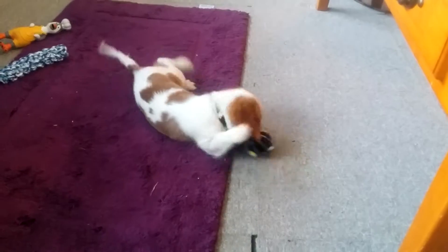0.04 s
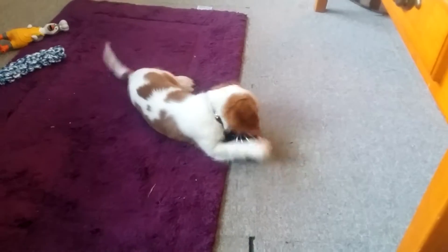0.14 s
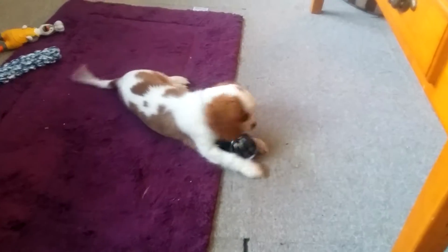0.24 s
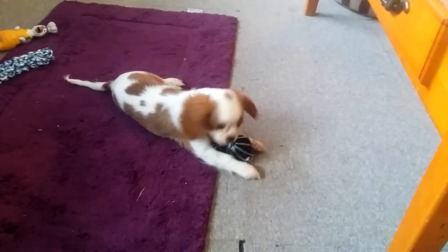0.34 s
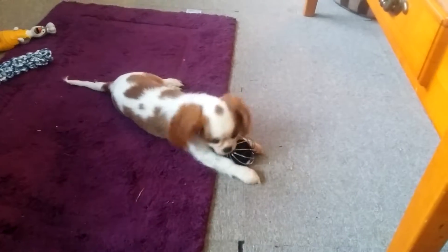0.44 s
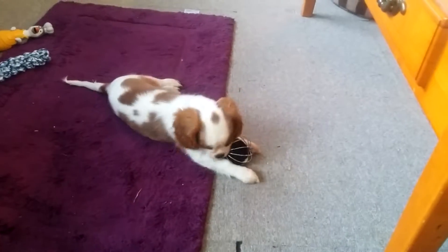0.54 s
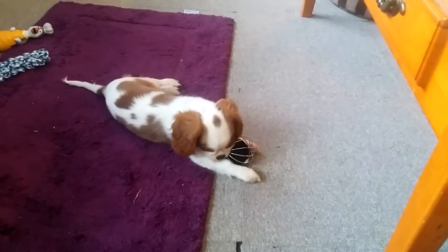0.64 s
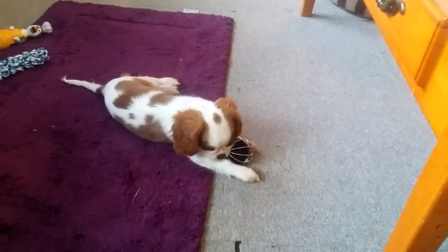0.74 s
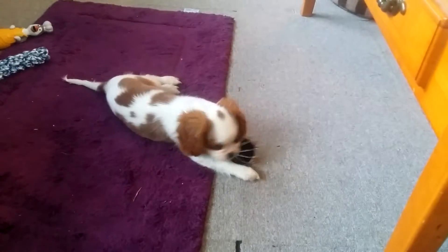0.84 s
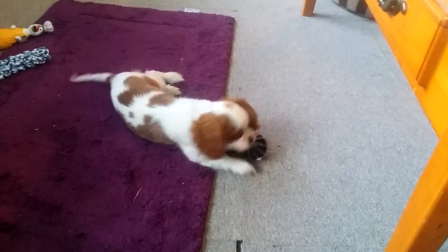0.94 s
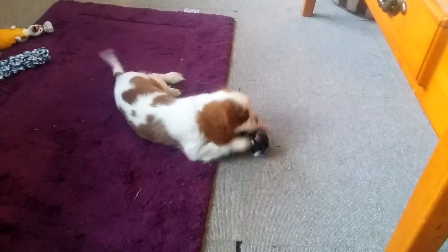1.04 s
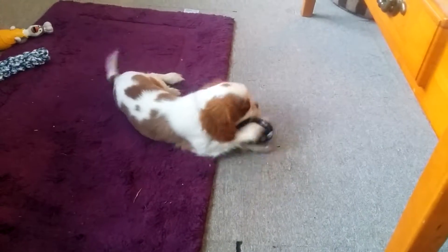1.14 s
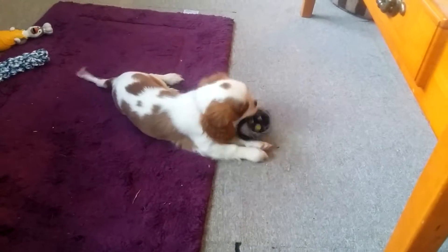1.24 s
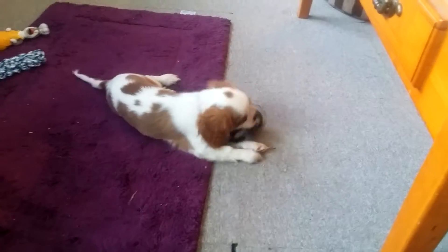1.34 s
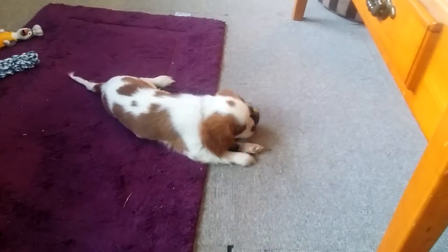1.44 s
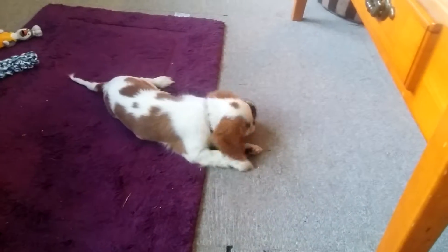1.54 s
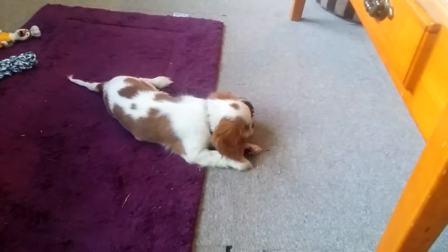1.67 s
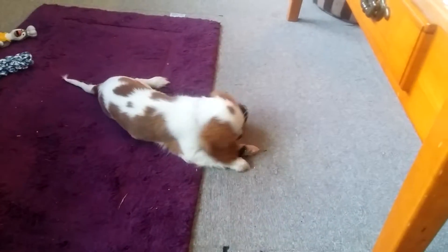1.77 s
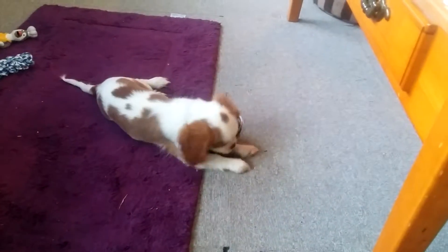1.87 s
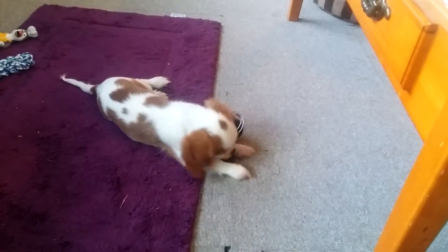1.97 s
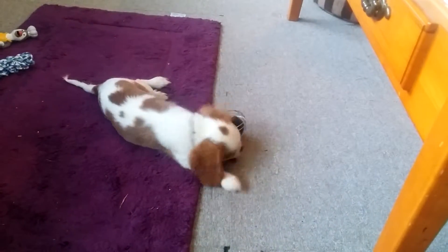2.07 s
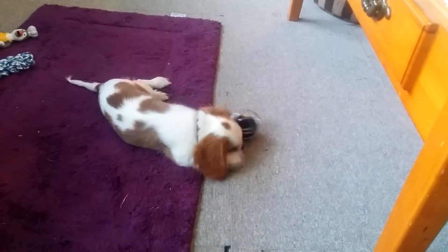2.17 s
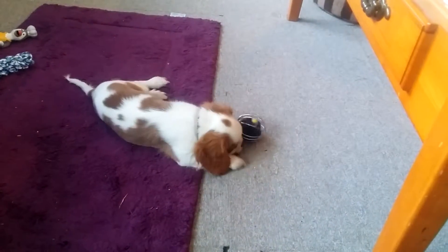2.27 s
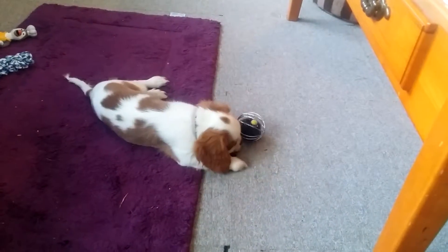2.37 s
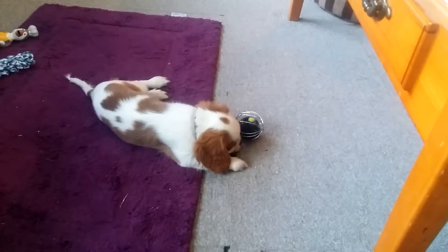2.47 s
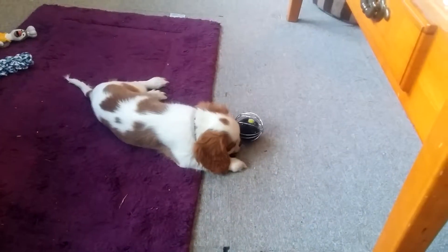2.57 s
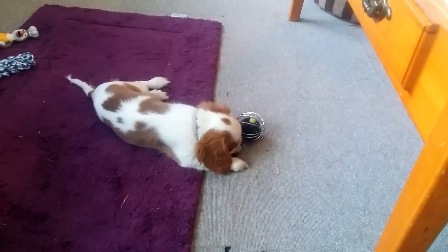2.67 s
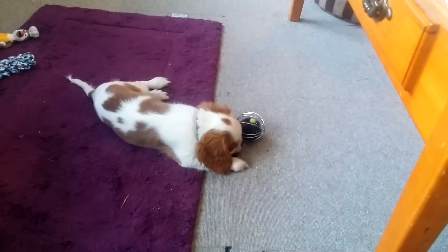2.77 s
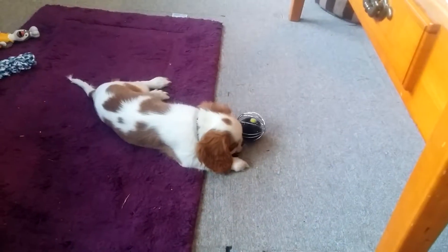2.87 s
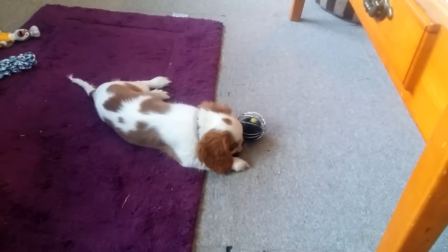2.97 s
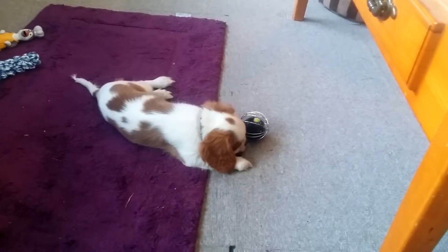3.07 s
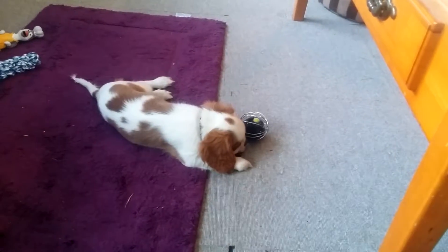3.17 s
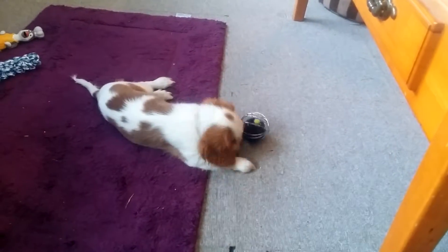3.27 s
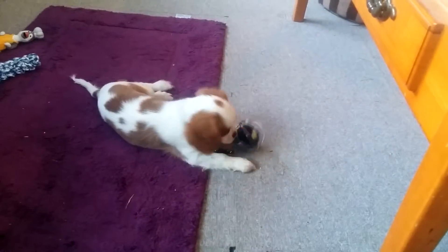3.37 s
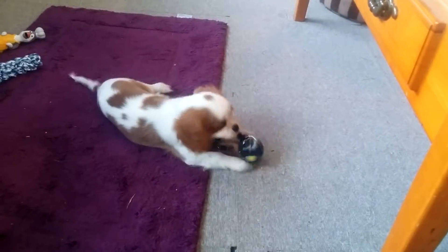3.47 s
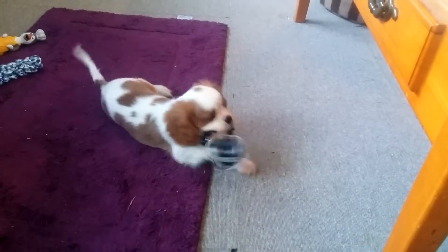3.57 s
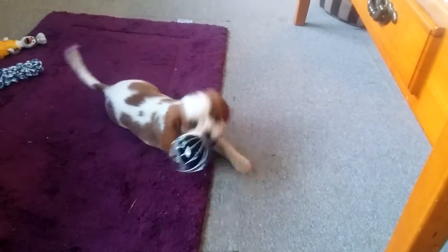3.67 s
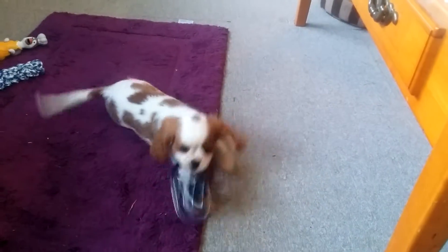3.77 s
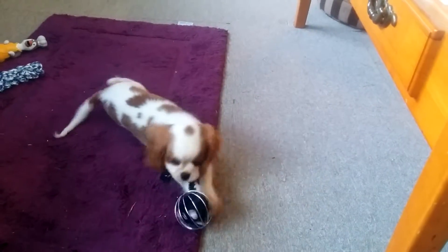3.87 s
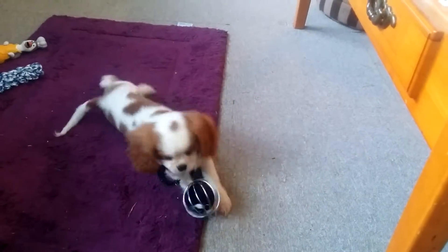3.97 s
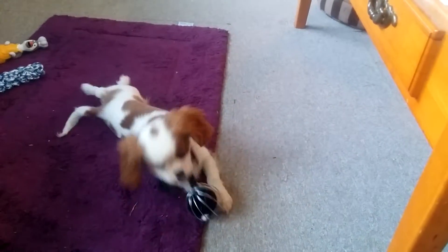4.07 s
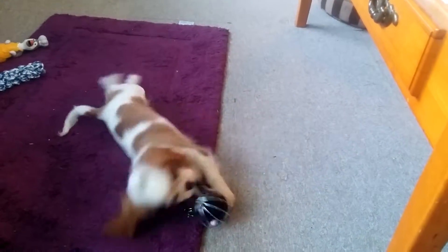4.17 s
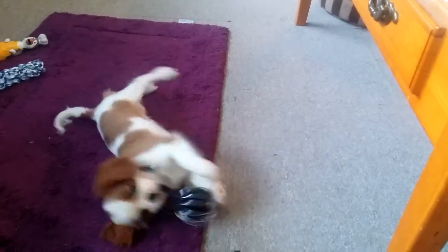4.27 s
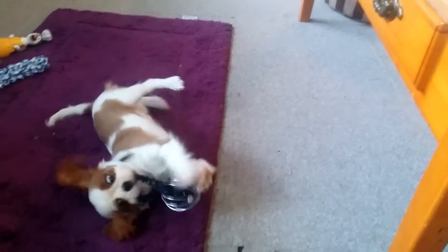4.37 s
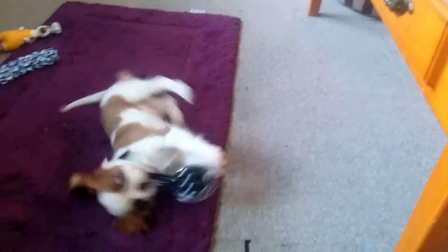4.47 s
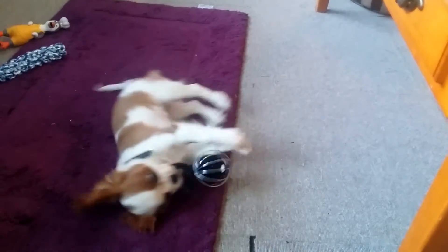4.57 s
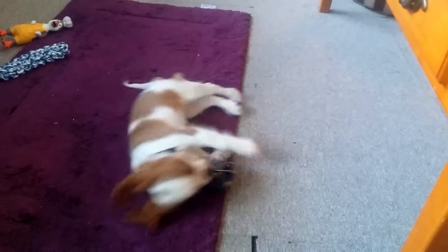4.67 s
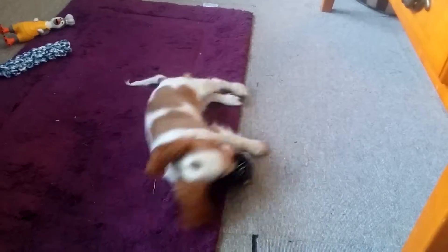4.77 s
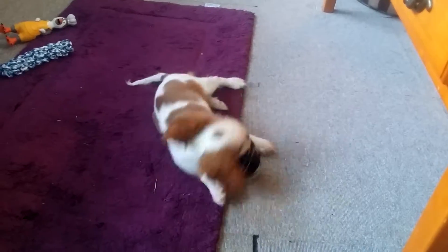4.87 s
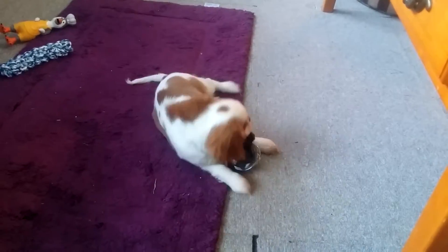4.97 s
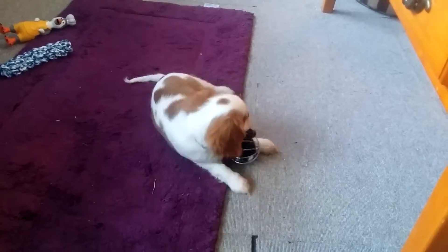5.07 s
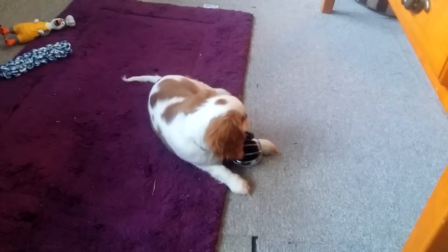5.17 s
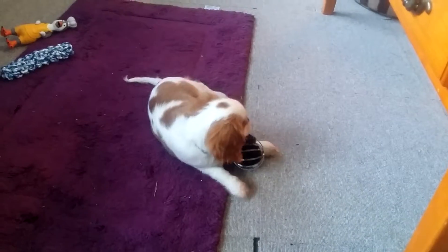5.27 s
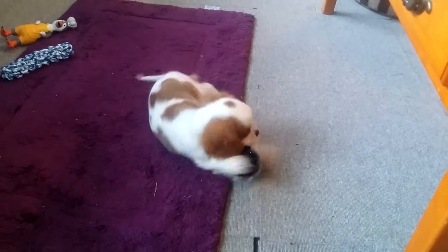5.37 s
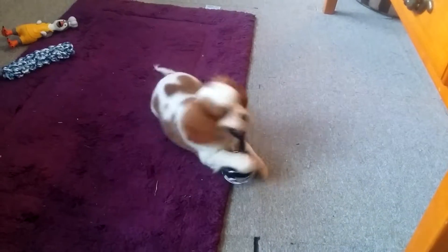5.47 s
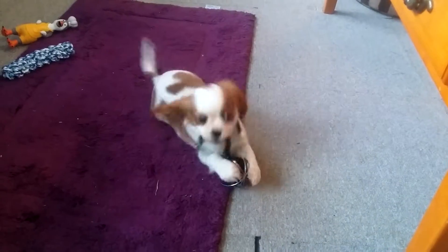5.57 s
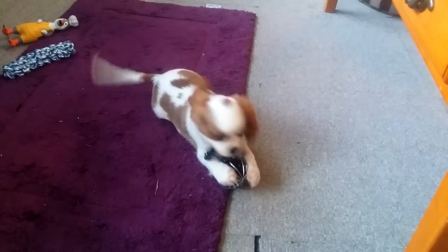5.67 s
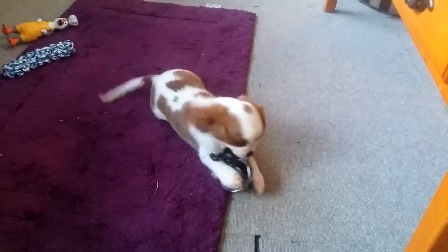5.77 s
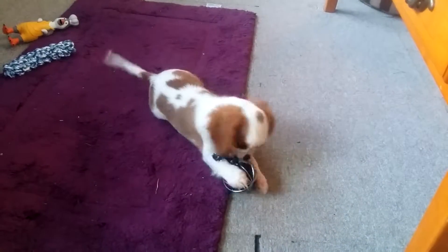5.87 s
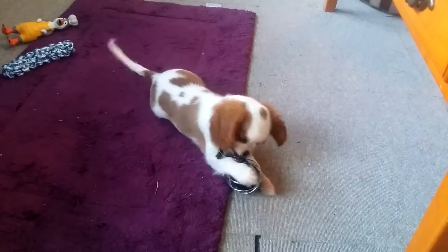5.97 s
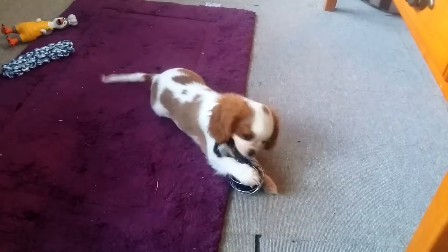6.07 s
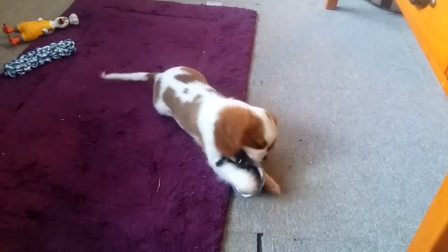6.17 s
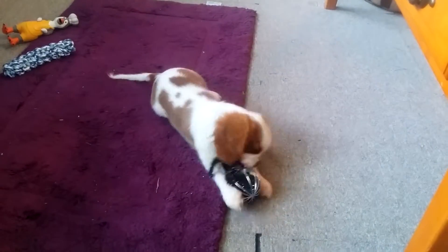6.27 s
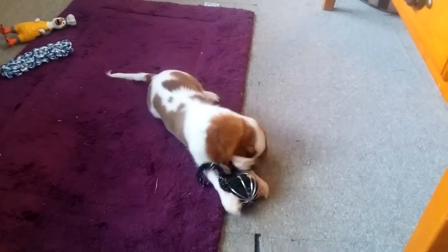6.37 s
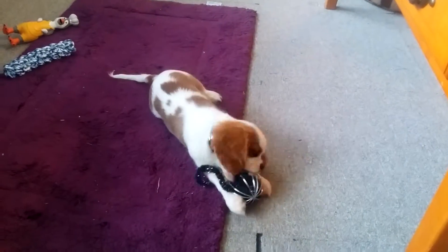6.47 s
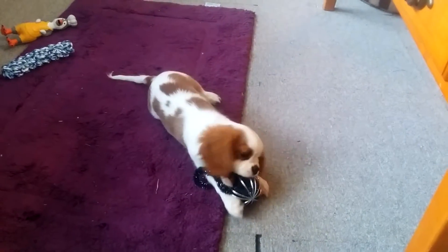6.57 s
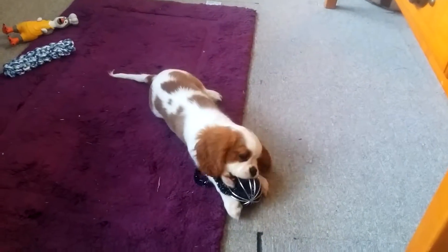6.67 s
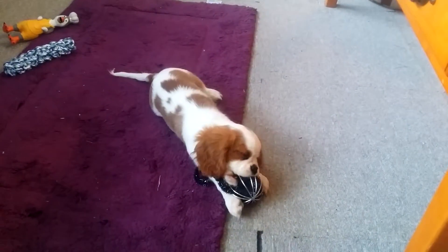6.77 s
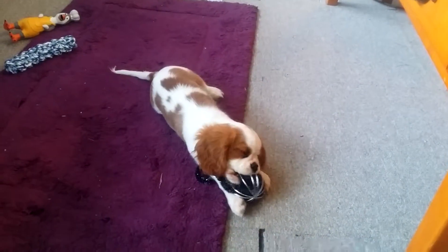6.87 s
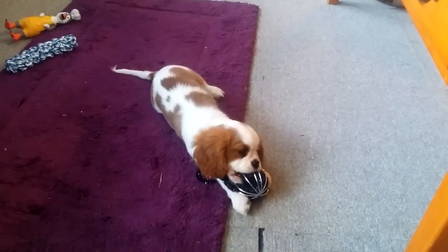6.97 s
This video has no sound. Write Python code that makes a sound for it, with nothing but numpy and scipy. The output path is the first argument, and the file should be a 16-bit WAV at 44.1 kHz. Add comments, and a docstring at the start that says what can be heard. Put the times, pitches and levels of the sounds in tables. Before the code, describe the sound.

A puppy plays with a hard slotted ball toy on carpet, heard from a couple of metres in a small furnished room with a short echo. Soft scuffs and a faint rattle open the first second. Around 1.2 to 1.6 seconds come dull thuds and a quick cluster of sharp, high clicks, followed by a few light ticks until 2.5 seconds and a lull. From 3.5 seconds the toy is shaken and dropped, its loose parts clattering against the faintly ringing cage. The loudest crack lands with a thud just before 4 seconds, and busy clicking and rattling continue until 5. Another burst of clicks with soft bumps comes at about 5.5 to 5.8 seconds. The rest is quiet, with one small knock near 6.6. The toy sounds brighter on the right. A few very faint squeaks occur along the way, over steady low rumble and hiss.

```python
"""Soft scuffs and a faint rattle, then sharp clicks: a puppy paws, shakes and drops a hard slotted ball toy.
Its loose parts click and rattle against the ringing cage; ball and paws thud on the carpeted floor.
Heard from a couple of metres on a phone's two microphones, in a small furnished room that adds
a short tail, over a few faint squeaks, low rumble and hiss."""
import sys
import numpy as np
from scipy import signal
from scipy.fft import rfft, irfft, next_fast_len
from scipy.io import wavfile
from scipy.ndimage import uniform_filter1d, map_coordinates

SR = 44100
rng = np.random.default_rng(int(sys.argv[2]) if len(sys.argv) > 2 else 0)


def generate_wav(sig):
    """Save sig (samples, or channels by samples) to the path in sys.argv[1] as 16-bit PCM at SR."""
    pcm = np.round(np.clip(np.atleast_2d(sig).T, -1, 1) * 32767).astype(np.int16)
    wavfile.write(sys.argv[1], SR, pcm)


N = 309395
T = np.arange(N) / SR


# Jolts that throw the loose parts against the cage, a couple of metres from the phone.
# Each row: start in seconds, level in dB, click pitch in Hz, bouncing time in seconds.
JOLTS = [(1.387, -9, 7000, 0.016), (1.4413, -18, 6100, .002), (1.4452, -15.5, 6000, 0.0045),
         (1.493, -18, 7150, .003), (1.5134, -20.5, 6740, 0.01), (1.557, -20, 7100, 0.0027),
         (2.004, -26, 6200, .003), (2.1864, -32, 5900, 0.02), (2.3101, -26, 5800, .002),
         (2.3572, -26, 6400, 0.0018), (2.5132, -28.5, 6950, 0.0022), (3.624, -12.5, 6800, 0.014),
         (3.7411, -15, 7500, 0.0023), (3.823, -14.5, 8000, 0.0022), (3.9017, -9.5, 6500, 0.007),
         (3.9322, 1.5, 6950, 0.0033), (3.936, 4.5, 7960, 0.013), (3.9923, -4.5, 7200, .002),
         (4.0392, -12, 7550, 0.017), (4.06, -5.5, 7100, 0.011), (4.137, -17, 7500, 0.0033),
         (4.164, -13, 7260, 0.0075), (4.2284, -17.5, 6600, .002), (4.2365, -16.5, 7360, .002),
         (4.2737, -17, 6200, 0.0066), (4.3301, -13, 6500, 0.0034), (4.36, -19.5, 6500, .002),
         (4.396, -12.5, 6500, .003), (4.4394, -13.5, 7100, 0.0024), (4.5268, -13, 7600, 0.0032),
         (4.537, -16, 7400, 0.0062), (4.5933, -10.5, 7200, 0.0022), (4.6108, -16, 7150, .002),
         (4.6186, -19, 6470, .002), (4.6786, -11, 7240, 0.0022), (4.7554, -7, 7500, 0.0089),
         (4.8088, -12, 6700, .012), (4.8889, -13.5, 7840, 0.0069), (4.9558, -13.5, 7000, 0.0018),
         (4.9789, -15, 6860, 0.004), (5.5518, -18, 6500, 0.0018), (5.555, -5, 8050, 0.0061),
         (5.5635, -9.5, 7400, .002), (5.5803, -9, 7900, 0.0021), (5.5931, -10, 6600, 0.0028),
         (5.6048, -11.5, 6360, .004), (5.61, -10, 7000, .002), (5.6299, -9.5, 7500, 0.0027),
         (5.6844, -16.5, 6500, 0.0036), (5.7156, -19, 7500, 0.0027), (5.7654, -24, 8040, 0.0036)]

def bounces(count=10, gap_s=.0028, gap_spread=.4, loss_db=12.5, pitch_octaves=.15):
    """Each jolt is a first contact and a run of ever weaker rebounds, returned as (s, dB, Hz) rows."""
    contacts = []
    for (s, db, hz, bouncing_s), (gap, spot) in zip(JOLTS, rng.uniform(-1, 1, (len(JOLTS), 2, count))):
        delays = np.cumsum(gap_s * (1 + gap_spread * gap))
        levels = db - loss_db * delays / max(bouncing_s, gap_s / 2)
        pitches = hz * 2 ** (pitch_octaves * spot)  # every rebound lands on another spot
        contacts += [(s, db, hz), *zip(s + delays, levels, pitches)]
    return contacts


# The spectrum of the parts' chatter and rattle. Each row: frequency in Hz, relative level in dB.
CLATTER_SPECTRUM = [(300, -28), (1000, -27.5), (2000, -20), (3000, -19), (4300, -3.5), (5500, -0.5),
                    (6700, 4.5), (8100, 2), (9300, -2), (11500, -12), (16000, -45)]

def clicks(rise_s=.0002, snap_db=-9, snap_hz=11500, snap_scatter_db=5, snap_s=.00006, chatter_db=-10):
    """Each contact is a sharp snap and a ping of a few cycles, then brief chatter as the parts settle."""
    t = T[:SR // 20]
    ping_shape = (t / rise_s * np.exp(1 - t / rise_s)) ** 2
    snap = np.exp(-((t - rise_s / 2) / snap_s) ** 2) * np.cos(2 * np.pi * snap_hz * t)
    settle = fade(t, t60=.011) * (1 - np.exp(-(t / rise_s / 2) ** 2))
    strikes, chatter_power = np.zeros(N), np.zeros(N)
    contacts = bounces()
    for (s, db, hz), (phase, hardness) in zip(contacts, rng.uniform(-.92, 1, (len(contacts), 2))):
        ping = ping_shape * np.sin(2 * np.pi * (hz * t + phase))
        strike = ping + snap * undb(snap_db + snap_scatter_db * hardness)
        add(strikes, s, undb(db) * strike)
        add(chatter_power, s, (undb(db) * settle) ** 2)
    chatter = np.sqrt(chatter_power) * unit(colour(rng.standard_normal(N), CLATTER_SPECTRUM))
    return strikes + undb(chatter_db) * chatter


# The toy nudged, rolled or shaken on the carpet. Each row: start in seconds, length in seconds,
# opening level in dB, loss by the end in dB (negative where the bout grows).
RATTLE_BOUTS = [(0, 0.13, -54, -4), (1.162, 0.18, -51, -2.5), (1.375, .05, -41, 7), (1.43, 0.13, -36, 12.5),
                (1.99, 0.039, -45, 0.5), (2.04, 0.32, -55, 0), (3.493, 0.19, -53.5, 6),
                (3.606, 0.075, -34, 7), (3.745, 0.14, -40.5, -1), (3.94, 0.08, -20, 18.5),
                (4.042, 0.064, -31.5, 7), (4.134, 0.027, -36, 0), (4.197, .07, -38, -1.5),
                (4.29, 0.24, -45, -4), (4.538, 0.16, -36.5, 6.5), (4.75, 0.12, -40, 2.5),
                (4.897, 0.086, -39, -0.5), (5.415, .11, -54.5, -3), (5.545, .17, -35, 10)]

def motion(attack_s=.0022, release_t60=.12):
    """How hard the toy moves: each bout starts quickly, sags or grows steadily, then comes to rest."""
    power = np.zeros(N)
    for start, length, db, sag_db in RATTLE_BOUTS:
        t = T[:int((length + release_t60) * SR)]
        attack = np.minimum(t / attack_s, 1)
        held = undb(db - sag_db * np.minimum(t / length, 1))
        release = fade(np.maximum(t - length, 0), release_t60)
        add(power, start, (attack * held * release) ** 2)
    return np.sqrt(power)


def rattle(per_second=190, scatter_db=4.5, tilt_db_per_octave=4):
    """Tiny contacts of uneven size while the toy moves, in three streams: dull, plain and bright."""
    out = np.zeros(N)
    for tilt in (-tilt_db_per_octave, 0, tilt_db_per_octave):
        sizes = undb(scatter_db * np.clip(rng.standard_normal(N), -2, 2)) * rng.choice([-1, 1], N)
        contacts = (rng.random(N) < per_second / SR) * sizes
        spectrum = [(hz, db + tilt * np.log2(hz)) for hz, db in CLATTER_SPECTRUM]
        out += unit(colour(contacts, spectrum))
    return motion() * unit(out)


# The modes of the toy's hard cage. Each row: frequency in Hz, relative level in dB, t60 in seconds.
CAGE_MODES = [(4666, -3, .25), (5184, -9, .22), (5631, -3, .22), (6223, -4, .25), (6380, -2, .25),
              (6525, -6, .22), (6669, -1, .2), (6803, -2, .22), (6988, 0, .22), (7133, -3, .2),
              (7487, -8, .2), (7700, -2, .22), (7933, -1, .22), (8237, 2, .24), (8350, 1, .2),
              (8850, -4, .2), (9254, -5, .19), (10119, 4, .2)]

def cage(contacts, ring_db=-61):
    """The bars of the cage ring on after every contact."""
    t = T[:SR // 2]
    ring = sum(undb(db) * fade(t, t60) * np.cos(2 * np.pi * hz * t) for hz, db, t60 in CAGE_MODES)
    return contacts + undb(ring_db) * convolve(contacts, ring)


# Ball and paws landing on the carpet.
# Each row: start in seconds, level in dB, floor pitch in Hz, t60 in seconds.
LANDINGS = [(1.193, -36.5, 52.3, 0.24), (1.335, -30, 48, 0.16), (1.384, -28, 58.4, 0.081),
            (3.668, -36.5, 54, 0.24), (3.921, -21.5, 63, 0.037), (3.94, -34, 78.4, 0.27),
            (4.026, -35, 49.6, 0.3), (4.745, -32.5, 69, 0.02), (4.778, -42, 77, 0.073),
            (4.809, -41, 33, 0.69), (5.519, -33.5, 86, 0.052), (5.553, -34.5, 60, 0.053)]
# The boards under the carpet. Each row: mode frequency in Hz, relative level in dB, t60 in seconds.
FLOOR_MODES = [(87, -4, 0.12), (115.2, -13.5, 0.3), (143.3, -15.5, 0.35)]

def thuds(level_db=1):
    """Soft blows push the floor for a few cycles, and the boards hum briefly."""
    t, out = T[:SR // 2], np.zeros(N)
    boards = sum(undb(db) * fade(t, t60) * np.sin(2 * np.pi * hz * t) for hz, db, t60 in FLOOR_MODES)
    for s, db, hz, t60 in LANDINGS:
        phase = 2 * np.pi * hz * t
        cushion = 1 - np.exp(-phase ** 2)  # the carpet rounds the onset
        add(out, s, undb(db + level_db) * cushion * (fade(t, t60) * np.sin(phase) + boards))
    return out


# Knocks and scuffs of paws and teeth, equally loud in both microphones.
# Each row: start in seconds, level in dB, low and high band edges in Hz, t60 in seconds.
PAWS_AND_TEETH = [(.008, -51.5, 250, 800, 0.38), (0.04, -50, 350, 900, 0.28), (.66, -49.5, 450, 880, 0.07),
                  (1.332, -43.5, 390, 800, 0.06), (1.379, -42.5, 387, 645, 0.093),
                  (1.442, -45, 1370, 3800, 0.11), (2.812, -53.5, 700, 780, 0.28),
                  (4.137, -47, 350, 1100, 0.059), (4.33, -32, 330, 1470, 0.021),
                  (4.758, -45.5, 696, 2420, 0.046), (4.755, -21.5, 3600, 5000, 0.02),
                  (5.343, -45, 300, 1700, 0.016), (5.515, -38.5, 380, 940, 0.058),
                  (5.683, -35, 3120, 3800, 0.03), (5.702, -39, 3100, 3750, 0.034),
                  (6.62, -47.5, 690, 930, 0.064)]

def knocks(rise_s=.0005):
    """Damped contacts: each is a short burst of noise in one broad resonance."""
    t, out = T[:SR // 4], np.zeros(N)
    for s, db, low_hz, high_hz, t60 in PAWS_AND_TEETH:
        burst = unit(band(rng.standard_normal(len(t)), low_hz, high_hz))
        add(out, s, undb(db) * burst * fade(t, t60) * (1 - np.exp(-t / rise_s)))
    return out


# Faint squeaks, more room than direct sound. Each row: start in seconds, relative level in dB.
SQUEAKS = [(0.254, -39.5), (1.856, -39), (4.557, -43.5), (5.457, -39.5)]

def squeaks(start_hz=2600, end_hz=1560, glide_s=.004, rise_s=.002, t60=.12, roughness=.1):
    """A rough tone that drops quickly, then holds its pitch as it dies away."""
    t, out = T[:SR // 5], np.zeros(N)
    glide_hz = end_hz + (start_hz - end_hz) * np.exp(-t / glide_s)
    envelope = (1 - np.exp(-t / rise_s)) * fade(t, t60)
    for s, db in SQUEAKS:
        jitter = unit(uniform_filter1d(rng.standard_normal(len(t)), size=25))
        hz = glide_hz * (1 + roughness * jitter)
        add(out, s, undb(db) * envelope * np.sin(2 * np.pi * np.cumsum(hz) / SR))
    return out


def room(x, wet_db, t60=.29, build_s=.0013):
    """Diffuse reflections, different at each microphone, build up after the direct sound."""
    t = T[:SR // 2]
    tails = rng.standard_normal((2, len(t))) * fade(t, t60) * (1 - np.exp(-(t / build_s) ** 2))
    return undb(wet_db) * np.array([convolve(x, tail / np.linalg.norm(tail)) for tail in tails])


# Room tone at the phone. Each row: frequency in Hz, left and right levels in dB per Hz, their correlation.
ROOM_TONE = [(29.4, -61.5, -66, 0.89), (57.5, -72, -70.5, 0.97), (106, -73.5, -77, 0.93),
             (245, -82.5, -81.5, 0.85), (488, -87.5, -88.5, 0.65), (1054, -90, -91.5, -0.031),
             (2110, -94, -96, -0.28), (2580, -92.5, -99.5, 0.36), (5260, -91, -97.5, -0.1),
             (6500, -88, -95, 0.083), (8320, -93.5, -101.5, 0.12), (13500, -101.5, -104.5, 0.015),
             (15600, -101, -104, -0.16)]
# A narrow hiss in the left microphone. Each row: time in seconds, level in dB.
HISS_SWELL = [(0, -67), (.8, -62), (1.6, -56), (2.7, -56.5), (3.5, -56), (5.2, -55), (5.9, -64.5),
              (7, -59.5)]

def ambience(hiss_low_hz=2950, hiss_high_hz=3500):
    """Rumble shared by both sides, airy hiss that differs between them, and a band that swells and fades."""
    size = next_fast_len(N)
    left_db, right_db, correlation = (across(np.array(ROOM_TONE)[:, [0, k]], size) for k in (1, 2, 3))
    white = rfft(rng.standard_normal((2, size))) * np.sqrt(SR) / 2
    shared, opposed = white * np.sqrt([1 + correlation, 1 - correlation])
    left = irfft((shared + opposed) * undb(left_db), size)[:N]
    right = irfft((shared - opposed) * undb(right_db), size)[:N]
    swell = undb(np.interp(T, *np.transpose(HISS_SWELL)))
    hiss = swell * unit(band(rng.standard_normal(N), hiss_low_hz, hiss_high_hz))
    low_cut = signal.butter(2, 20, "high", fs=SR, output="sos")
    return signal.sosfilt(low_cut, [left + hiss, right])


def undb(db):
    """Decibels to gain."""
    return 10 ** (np.asarray(db) / 20)


def unit(x):
    """Scale to an rms of 1."""
    return x / np.sqrt(np.mean(x ** 2))


def fade(t, t60):
    """Exponential decay that loses 60 dB in t60 seconds."""
    return np.exp(-np.log(1000) * t / t60)


def add(track, s, sound):
    """Mix a sound into a track at s seconds."""
    i = max(int(s * SR), 0)
    track[i:i + len(sound)] += sound[:len(track) - i]


def across(points, size):
    """Read (Hz, value) points at the frequencies of a spectrum, on a log axis."""
    hz, value = np.transpose(points)
    return np.interp(np.log(np.fft.rfftfreq(size, 1 / SR) + 1), np.log(hz), value)


def colour(x, points):
    """Filter by a (Hz, dB) spectrum."""
    size = next_fast_len(len(x))
    return irfft(rfft(x, size) * undb(across(points, size)), size)[:len(x)]


def band(x, low_hz, high_hz):
    """Band-pass between two edges."""
    return signal.sosfilt(signal.butter(2, [low_hz, high_hz], "band", fs=SR, output="sos"), x)


def convolve(x, response):
    """Pass a sound through an impulse response."""
    return signal.oaconvolve(x, response)[:N]


# How the left microphone hears the toy relative to the right. Each row: frequency in Hz, gain in dB.
LEFT_MIC_RESPONSE = [(500, 4.5), (2000, -4.5), (3500, 0), (5000, -6), (6200, -10.5), (7300, -15.5),
                     (9000, -14.5), (12000, -13), (16000, -4)]

def scene():
    """The toy, brighter and more direct on the right, with the soft sounds and the room around it."""
    toy = cage(clicks() + rattle())
    early = map_coordinates(toy, [np.arange(N) + 1.7], order=3)  # the left microphone is a little nearer
    left = colour(early + room(toy, wet_db=-1)[0], LEFT_MIC_RESPONSE)
    right = toy + room(toy, wet_db=-9)[1]
    knock, squeak = knocks(), squeaks()
    knocks_in_room = knock + room(knock, wet_db=-6)
    squeaks_in_room = undb(-10) * squeak + room(squeak, wet_db=-3)
    return np.array([left, right]) + thuds() + knocks_in_room + squeaks_in_room + ambience()


def record(dry):
    """The phone clips the hardest blow and cuts the top above 15.9 kHz."""
    top_cut = signal.ellip(8, .2, 70, 15900, fs=SR, output="sos")
    return signal.sosfilt(top_cut, np.clip(dry, -1, 1))


dry = scene()
out = record(dry)
generate_wav(out)
```